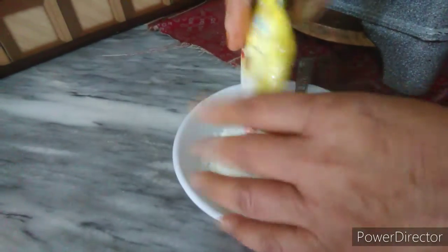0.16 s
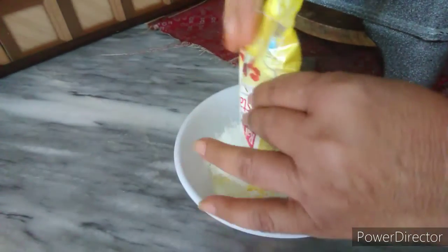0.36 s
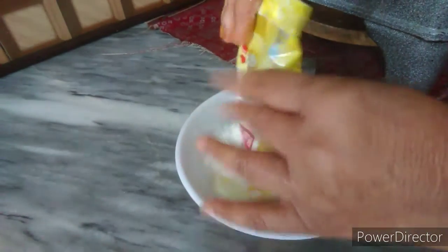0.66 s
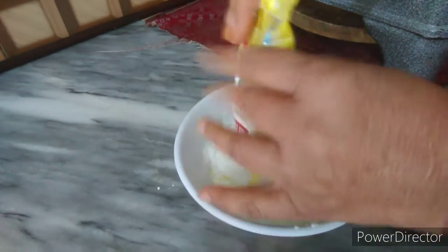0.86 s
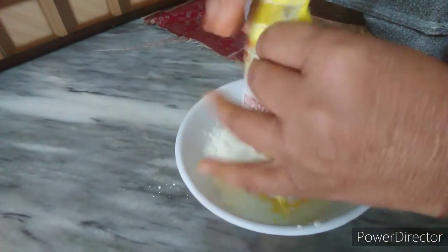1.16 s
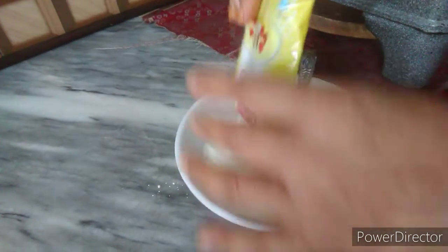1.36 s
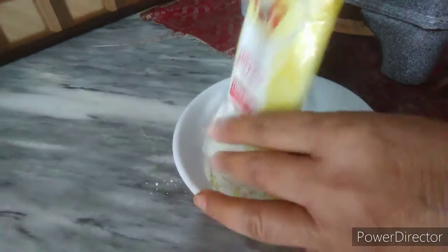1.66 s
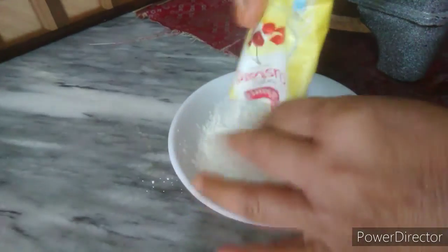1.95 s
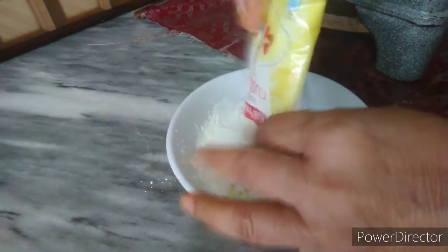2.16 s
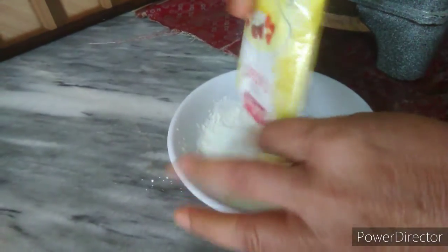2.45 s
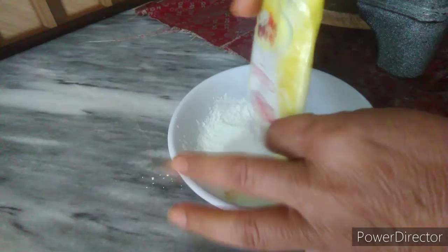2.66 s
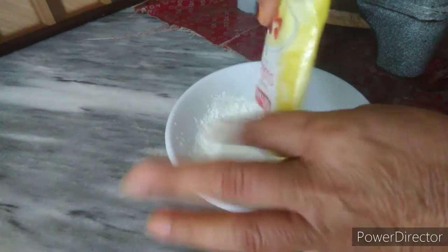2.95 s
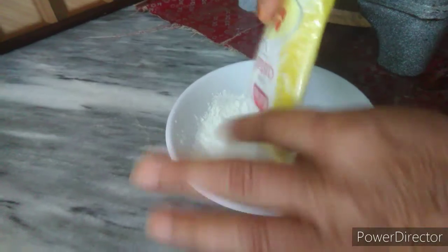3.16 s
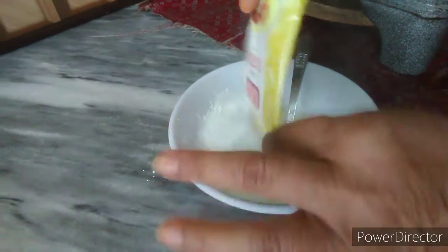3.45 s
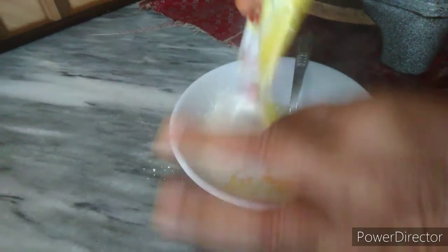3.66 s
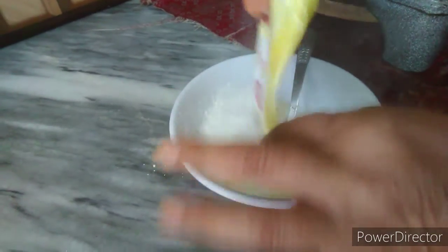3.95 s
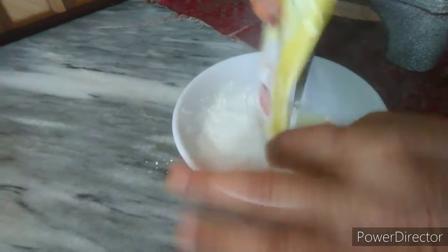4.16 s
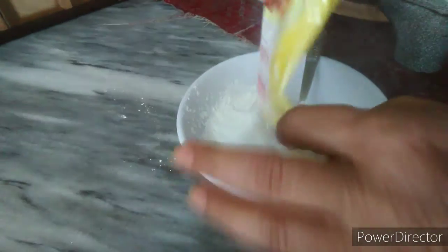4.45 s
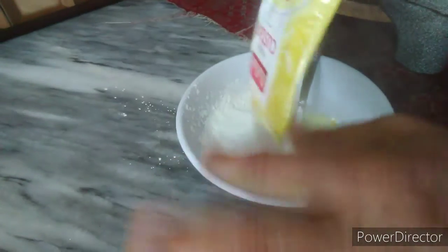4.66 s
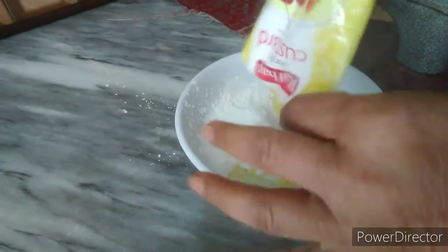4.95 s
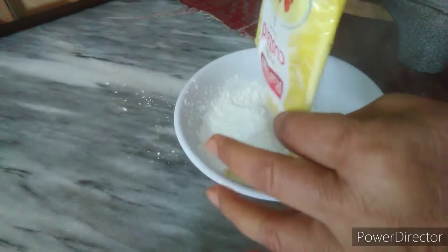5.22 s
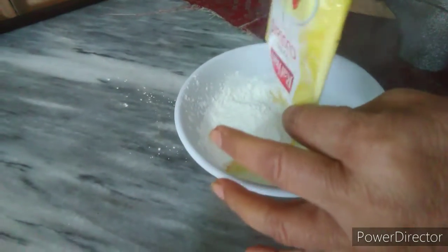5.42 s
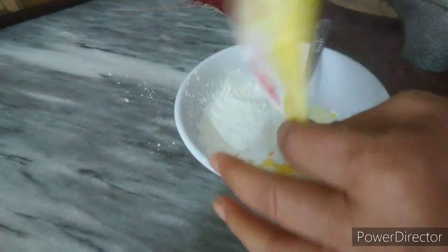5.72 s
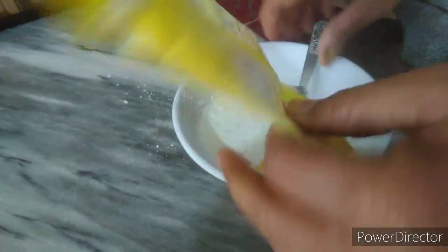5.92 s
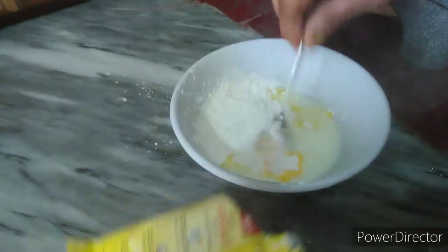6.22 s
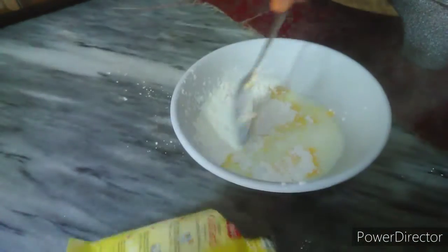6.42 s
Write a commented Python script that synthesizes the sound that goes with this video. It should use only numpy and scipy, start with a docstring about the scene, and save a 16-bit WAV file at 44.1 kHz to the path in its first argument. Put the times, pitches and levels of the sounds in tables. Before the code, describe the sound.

A small plastic packet is shaken and squeezed empty close to a phone in a small hard-walled kitchen. Sharp crackling snaps come in uneven bursts, about five shakes a second, with soft low flaps beneath. The crinkling grows louder and brighter toward the middle, thins out, snaps hard once more, then the packet is laid on stone with a soft thud and brief slide. A low hum stays underneath.

```python
"""Plastic sachet emptied in a kitchen

A plastic sachet is shaken and squeezed empty over a ceramic bowl, close to a phone in a small kitchen.
Each buckling crease is a run of tiny snaps, noise cracks plus decaying pings, over a fine crackle of clicks.
Shaped low noise makes the packet flap and thud at each shake. At the end it is laid on the stone counter
with a soft thud and slides: clicks through rising resonances. Mains hum and still air lie under it all.
"""
import sys
import numpy as np
from scipy import signal
from scipy.fft import rfft, irfft, next_fast_len
from scipy.io import wavfile
from scipy.ndimage import uniform_filter1d, map_coordinates

SR = 44100
rng = np.random.default_rng(int(sys.argv[2]) if len(sys.argv) > 2 else 0)


def dump(signal):
    """Clip the signal to [-1, 1] and save it as 16-bit WAV at the path in sys.argv[1]."""
    limited = np.clip(np.atleast_2d(signal).T, -1, 1)
    pcm = np.round(limited * 32767).astype(np.int16)
    wavfile.write(sys.argv[1], SR, pcm)


N = 290419
TIME_S = np.arange(N) / SR

# Radiation of the film. Each row: frequency in Hz, relative level in dB.
FILM = [(35, -38), (130, -19), (300, -14.5), (600, -8.5), (1150, -7.5), (1720, -4), (2400, -9.5),
        (3200, -0.5), (4400, -5.5), (5200, -2), (6200, -5.5), (7700, 0), (10100, -7.5), (11300, -14),
        (12700, -11.5), (14000, -16.5)]
# Shakes of the hand, about five a second; each crumples the film and jolts the packet. Each row: time in s,
# crumple energy in dB as rms over 1 ms, run spread in ms, relative jolt strength in dB, fold ring in Hz.
SHAKES = [(1.115, -15.5, 6.2, -39, 1700), (1.236, -14.5, 6.4, -33, 1710), (1.597, -26, 3, -35.5, 7910),
          (1.754, -18.5, 1.97, -32, 1680), (2.0196, -11, 4.7, -29, 5350), (2.212, -12.5, 5.2, -29, 2825),
          (2.418, -14, 5.46, -36.5, 3120), (2.608, -10.5, 6.1, -29.5, 826), (2.794, -14, 3.7, -29.5, 4900),
          (2.976, -19, 3, -32, 5220), (3.1653, -16.5, 4.1, -26, 3210), (3.397, -15.5, 3, -30, 3350),
          (3.596, -5.5, 1.84, -33, 860), (3.806, -9, 4.3, -32.5, 1560), (4.032, -5.5, 3.4, -29.5, 7910),
          (4.243, -8, 8.6, -42.5, 940), (4.464, -9, 4.4, -48, 7480), (4.75, -18, 5.3, -32.5, 1160),
          (5.091, -8, 2.74, -34.5, 9000), (5.281, -18, 2.4, -40.5, 3680), (5.477, -13.5, 2.6, -29, 3226),
          (5.641, -3.5, 2.8, -26, 3080)]
# Loudest creases before, during and between the shakes. Each row: time in s, energy in dB as rms over 1 ms,
# run spread in ms, fold ring in Hz, ring height in dB before the cap MAX_RING_DB.
CREASES = [(0.025, -40, 15, 1390, 10), (0.058, -19, 8, 1880, 11), (0.08, -19.5, 0.7, 1770, 13),
           (0.106, -10.5, 0.9, 900, 10), (0.253, -28, 6.4, 8200, 23), (0.397, -25, 3, 1720, 10),
           (0.439, -12.5, 2.8, 10300, 3.5), (0.461, -16.5, 1.05, 2260, 5), (0.554, -20.5, 0.65, 9250, 8),
           (0.583, -17.5, 0.73, 1690, 15), (0.645, -16, 0.94, 3320, 2.5), (0.668, -24.5, 6, 1300, 5),
           (0.77, -30.5, 0.6, 7900, 2), (0.791, -19, 0.8, 1730, 12), (0.816, -22, 1, 3080, 0),
           (0.888, -27, 5.1, 1360, 4.5), (0.929, -22, 0.7, 1700, 11), (0.964, -35, 0.6, 1700, 9.5),
           (1.018, -16, 10.4, 1940, 5), (1.136, -13.5, 1.84, 5830, 1), (1.205, -27, 1.2, 2270, 16),
           (1.256, -12.5, 0.53, 1720, 6), (1.333, -20.5, 7.5, 1730, 8), (1.349, -16.5, 2.64, 756, 8),
           (1.362, -21, 1.36, 3260, 9), (1.627, -15.5, 0.97, 3240, 7), (1.682, -17, 0.88, 2760, -2),
           (1.697, -16.5, 0.5, 3020, 16), (1.766, -23, 2.4, 1810, 8), (1.845, -26, 4.3, 5800, 9),
           (1.857, -20, 1.4, 6040, 11), (1.91, -20.5, 4, 5850, 9.5), (2.071, -15, 0.96, 8000, 5),
           (2.103, -16, 9, 930, 1), (2.182, -16.5, 7, 2540, 1.5), (2.29, -22.5, 8.2, 1200, -2),
           (2.3045, -13, 3, 1190, -9), (2.349, -20.5, 0.8, 774, 10), (2.483, -19, 8.2, 3800, -1),
           (2.497, -16.5, 0.92, 3820, 10.5), (2.541, -16.5, 3, 5220, 0), (2.661, -13.5, 0.61, 1920, 13),
           (2.717, -25, 0.5, 1770, 9), (2.87, -14.5, 1.22, 9500, 11), (2.923, -35, 0.7, 3500, 5),
           (2.959, -14, 0.56, 10100, 12), (3.039, -15.5, 7, 1900, 8.5), (3.177, -14.5, 1.3, 1000, 20),
           (3.226, -15, 3, 3380, 1.5), (3.349, -22.5, 3, 870, 9.5), (3.456, -20, 5.1, 3350, 2.5),
           (3.54, -14, 9.4, 1010, 8), (3.556, -12, 0.75, 910, 4), (3.581, -11.5, 1.13, 1720, 9),
           (3.604, -7.5, 1.4, 3100, -1), (3.674, -11.5, 0.56, 9800, 10.5), (3.703, -19, 1, 5200, -2),
           (3.719, -15.5, 5.4, 3170, -2), (3.734, -18.5, 0.82, 3440, 7), (3.88, -13, 5.3, 1680, 9),
           (3.905, -10.5, 0.7, 10000, 9), (3.921, -10, 4, 4700, 2.5), (3.991, -12.5, 0.45, 3170, 15),
           (4.104, -13, 3, 1200, 2), (4.312, -18, 1.5, 7700, -1), (4.135, -8, 0.7, 9500, 7),
           (4.145, -10, 12, 8360, 6), (4.243, -9.5, 0.8, 7910, -1), (4.323, -12.5, 3.9, 1524, 5),
           (4.344, -7, 0.95, 10300, 13), (4.352, -13, 6, 1190, 7), (4.371, -8.5, 3, 990, 9),
           (4.379, -8.5, 0.7, 1040, 7), (4.388, -14, 1, 8590, 6), (4.474, -10, 1, 7480, 5),
           (4.561, -14.5, 0.63, 7910, -3), (4.61, -12.5, 4.1, 9800, 7), (4.735, -12, 0.42, 4670, 7),
           (4.903, -19, 2.24, 5200, 2), (4.97, -23, 2, 9600, 2), (5.044, -23, 1.8, 9000, 2),
           (5.07, -19, 2.5, 4930, 7), (5.163, -18.5, 1.97, 3260, 3), (5.348, -22.5, 1.4, 3940, 11),
           (5.46, -19.5, 4.5, 2800, 1.5), (5.511, -18.5, 1.36, 2760, 5), (5.53, -17, 1.06, 8000, 3.5),
           (5.686, -17.5, 1.6, 3170, 6), (5.696, -11.5, 2.36, 4570, 6), (5.71, -17.5, 2.23, 2740, 6)]
# Bouts of handling; brightness is a base that each crease offsets.
# Each row: start in s, end in s, rustle level in dB, brightness in dB per octave.
BOUTS = [(0.028, 0.11, -54.5, -1.7), (0.439, 1.35, -54.5, -0.93), (1.596, 1.917, -64.5, -2),
         (1.998, 3.533, -49, -1.5), (3.54, 4.675, -40.5, 2), (4.893, 5.197, -57.5, 0),
         (5.266, 5.716, -68, -2)]

GRIP_S, RELEASE_S = 0.0084, 0.042  # rise and decay time constants of a bout
MIN_SPREAD_MS = 0.2
PRELUDE_MS = 6  # faint ticks ahead of a run
MAX_RING_DB = 10


def undb(db):
    """Decibels to gain."""
    return 10 ** (np.asarray(db) / 20)


def unit(x):
    """Scale to rms 1."""
    return x / np.sqrt(np.mean(x ** 2))


def pan(right_db):
    """Left and right gains that make the right louder by the given dB."""
    return undb(np.multiply.outer([-0.5, 0.5], right_db))


def add(out, s, sound):
    """Mix a sound in at time s."""
    start = max(int(s * SR), 0)
    out[:, start:start + sound.shape[1]] += sound[:, :max(N - start, 0)]


def gesture(start_s, end_s, rise_s, fall_s):
    """Gain over time: exponential attack, hold, release."""
    attack = 1 - np.exp(-np.maximum(TIME_S - start_s, 0) / rise_s)
    return attack * np.exp(-np.maximum(TIME_S - end_s, 0) / fall_s)


def colour(x, points, tilt_db=0, knee_hz=700):
    """Minimum-phase filter through (Hz, dB) points, tilted by dB per octave above the knee."""
    size = x.shape[-1]
    octave = np.log2(np.maximum(np.fft.rfftfreq(size, 1 / SR), 1))
    hz, db = np.transpose(points)
    gain_db = np.interp(octave, np.log2(hz), db)
    gain_db = gain_db + tilt_db * np.maximum(octave - np.log2(knee_hz), 0)
    # folding the cepstrum onto positive time makes the filter causal
    cepstrum = irfft(gain_db * np.log(10) / 20, size)
    cepstrum[1:size // 2] *= 2
    cepstrum[size // 2 + 1:] = 0
    return irfft(rfft(x) * np.exp(rfft(cepstrum)), size)


def ports(pair, likeness=0.65, alike_hz=1200):
    """Two unrelated signals become left and right: long waves reach both ports more alike than short ones."""
    size = pair.shape[-1]
    alike = likeness / (1 + (np.fft.rfftfreq(size, 1 / SR) / alike_hz) ** 2)
    mid, side = irfft(rfft(pair) * np.sqrt([1 + alike, 1 - alike]), size)
    return np.array([mid + side, mid - side])


def noise(points):
    """Steady stereo noise of a given colour, rms 1."""
    return unit(colour(ports(rng.standard_normal((2, N))), points))


def hum(hum_hz=99.3, third_db=-38):
    """About twice the mains frequency plus a weak third harmonic, drifting in level."""
    # Each row: time in s, level in dB before panning.
    hum_levels = [(0, -52.5), (1.25, -50), (1.55, -55.5), (2.1, -50), (3.5, -51.5), (6.15, -49),
                  (6.58, -56.5)]
    phase = 2 * np.pi * hum_hz * TIME_S
    tone = unit(np.sin(phase) + undb(third_db) * np.sin(3 * phase))
    return tone * undb(np.interp(TIME_S, *np.transpose(hum_levels)))


def still_air(level_db=-58):
    """Steady low-pitched noise of the room's air."""
    # Each row: frequency in Hz, relative level in dB.
    air_points = [(25, -24.5), (50, -4.5), (110, 5), (200, -7), (400, -35.5), (1500, -37), (6000, -40.5),
                  (14000, -37)]
    return noise(air_points) * undb(level_db)


def noise_bands(size):
    """Two white noises split into the bands in which the facets crack."""
    # A plain list of band edges in Hz.
    band_edges_hz = [0, 1200, 2400, 4500, 7000, 10000, 20000]
    hz = np.fft.rfftfreq(size, 1 / SR)
    edges = np.array(band_edges_hz)[:, None, None]
    masks = (hz >= edges[:-1]) & (hz < edges[1:])
    return irfft(rfft(rng.standard_normal((2, size))) * masks, size)


def snap_run(spread_ms, rise_ms=0.5, ring_ms=1.35, ping=0.6, low_hz=1200, high_hz=11000,
             prelude_db=-16, prelude_count=5, snap_range_db=13, facet_scatter_db=4.5, size=3072):
    """A crease gives way: faint ticks, then snaps that swell and die, each with its own facet's colour and ring."""
    count = min(5 + int(3 * spread_ms), 40)
    chance = rng.random((11, prelude_count + count))
    jitter, strength, pitch, turn_left, turn_right = chance[:5]

    nearing = (np.arange(prelude_count) + jitter[:prelude_count]) / prelude_count
    progress = 5.5 * (np.arange(count) + jitter[prelude_count:]) / count  # in spreads
    start_ms = np.r_[PRELUDE_MS * nearing, PRELUDE_MS + spread_ms * progress]
    force = np.r_[undb(prelude_db) * nearing, np.sqrt(progress * np.exp(-progress))]
    force = force * undb(snap_range_db * strength)

    age_ms = np.maximum(np.arange(size) / SR * 1000 - start_ms[:, None], 0)
    fade = force[:, None] * (1 - np.exp(-age_ms / rise_ms)) * np.exp(-age_ms / ring_ms)
    facet_hz = low_hz * (high_hz / low_hz) ** pitch
    turns = facet_hz[:, None] * age_ms / 1000 + np.array([turn_left, turn_right])[:, :, None]
    pings = (fade * np.sin(2 * np.pi * turns)).sum(1)

    # sqrt(3) gives the uniform draw a standard deviation of facet_scatter_db
    band_gains = undb(facet_scatter_db * np.sqrt(3) * (2 * chance[5:] - 1))
    mean_power = np.mean(band_gains ** 2, axis=1, keepdims=True)
    swells = np.sqrt(band_gains ** 2 @ fade ** 2 / mean_power)
    crack = (swells[:, None] * noise_bands(size)).sum(0)
    return crack + ping * pings


def fold_colour(ring_hz, ring_db, count=90, scatter_db=1.5, detune_oct=0.075, ring_width_oct=0.15):
    """Film resonances, shifted and reweighted by one fold's shape, plus the ring of its largest facet."""
    hz, film_db = np.transpose(FILM)
    chance = rng.standard_normal(len(hz) + 1)
    octave = np.linspace(np.log2(100), np.log2(16000), count)
    film = np.interp(octave + detune_oct * chance[0], np.log2(hz), film_db + scatter_db * chance[1:])
    distance = (octave - np.log2(ring_hz)) / ring_width_oct
    facet = min(ring_db, MAX_RING_DB) * np.exp(-0.5 * distance ** 2)
    return np.column_stack([2 ** octave, film + facet])


def crinkles(rows, echo_ring_share=0.36):
    """Buckling creases: each fold beams its ring straight ahead; sound for the echoes has a milder share."""
    near, far = np.zeros((2, 2, N))
    for s, db, spread_ms, tilt_db, ring_hz, ring_db in rows:
        run = ports(snap_run(max(spread_ms, MIN_SPREAD_MS)))
        for out, height_db in ((near, ring_db), (far, ring_db * echo_ring_share)):
            sound = colour(run, fold_colour(ring_hz, height_db), tilt_db)
            one_ms_gain = np.sqrt(2 * SR / 1000 / np.sum(sound ** 2))  # 0 dB: rms 1 over 1 ms
            add(out, s - PRELUDE_MS / 1000, sound * undb(db) * one_ms_gain)
    return near, far


def brightness(s, db, spread_ms, force_tilt_db=0.13, typical_db=-16, typical_ms=3.97, quick_tilt_db=1.0):
    """Crease tilt in dB per octave: set by the nearest bout, brighter the harder and quicker it gives way."""
    grip = min(BOUTS, key=lambda bout: max(bout[0] - s, s - bout[1]))
    force_tilt = force_tilt_db * (db - typical_db)
    quick_tilt = quick_tilt_db * np.log2(typical_ms / max(spread_ms, MIN_SPREAD_MS))
    return grip[3] + force_tilt + quick_tilt


def small_creases(latest_s=0.03, level_db=-16, mean_ms=1.2, low_hz=1500, high_hz=9000, ring_db=9):
    """Each shake or crease with a spread over 2 ms sets off a faint neighbour: rows like CREASES."""
    slow = [row[:3] for row in SHAKES + CREASES if row[2] > 2]
    s, db, _ = np.transpose(slow)
    delay, length, pitch = rng.random((len(s), 3)).T
    starts_s = s + latest_s * (1 + delay) / 2
    rings_hz = low_hz * (high_hz / low_hz) ** pitch
    rows = zip(starts_s, db + level_db, 2 * mean_ms * length, rings_hz)
    return [(*row, ring_db) for row in rows]


def folds(shake_tilt_db=-1, shake_ring_db=5):
    """All shaken and pressed folds; shaken ones are broad and duller. Rows as crinkles() takes them."""
    shaken = [(s, db, ms, brightness(s, db, ms) + shake_tilt_db, hz, shake_ring_db)
              for s, db, ms, _, hz in SHAKES]
    pressed = [(s, db, ms, brightness(s, db, ms), *ring)
               for s, db, ms, *ring in CREASES + small_creases()]
    return shaken + pressed


def handling():
    """How hard the fingers work the film, as a gain over time."""
    return sum(undb(db) * gesture(start, end, GRIP_S, RELEASE_S) for start, end, db, _ in BOUTS)


def grains(rate_per_s, scatter_db, ring_ms, size=512):
    """A steady shower of tiny noise clicks of unequal size."""
    sizes_db = scatter_db * np.minimum(rng.exponential(size=N), 4)
    clicks = (rng.random(N) < rate_per_s / SR) * undb(sizes_db) ** 2
    decay = np.exp(-2 * np.arange(size) / SR * 1000 / ring_ms)
    power = signal.fftconvolve(clicks, decay)[:N]
    return ports(np.sqrt(np.abs(power)) * rng.standard_normal((2, N)))


def rustle(buckles, settle_s=0.0042, settle_db=-12):
    """Fine crackle: the film slides under the fingers and keeps settling after each buckle."""
    keep = np.exp(-1 / (settle_s * SR))
    strain = signal.lfilter([1 - keep], [1, -keep], np.mean(buckles ** 2, axis=0))
    clicks = grains(rate_per_s=140, scatter_db=4.5, ring_ms=1.2)
    crackle = unit(colour(clicks, FILM, tilt_db=-3.0))
    return crackle * (handling() + undb(settle_db) * np.sqrt(strain))


def flapping(flap_db=-21.5, flap_s=0.17, flex_db=-13.5):
    """Gain of the packet's walls: they flex under the fingers and swing on after shakes while handled."""
    swing = sum(undb(db + flap_db) * gesture(s, s, GRIP_S, flap_s) for s, _, _, db, _ in SHAKES)
    held = sum(gesture(start, end, GRIP_S, RELEASE_S) for start, end, _, _ in BOUTS)
    return swing * held + undb(flex_db) * handling()


def thuds(rows, points, rise_s, fall_s, size=8192):
    """Soft pushes of air of a given colour, from (s, dB) rows."""
    out, t = np.zeros((2, N)), np.arange(size) / SR
    swell = (1 - np.exp(-t / rise_s)) * np.exp(-t / fall_s)
    for s, db in rows:
        push = unit(colour(ports(rng.standard_normal((2, size)) * swell), points))
        add(out, s, push * np.sqrt(np.mean(swell ** 2)) * undb(db))
    return out


def flexing(thud_db=-4.0):
    """The whole packet pushes air: its walls flap as it is handled and thud at each jolt."""
    # Each row: frequency in Hz, relative level in dB.
    packet_points = [(40, -34.5), (85, -12), (145, 3.5), (190, -4.5), (260, -5), (400, -6), (800, -13),
                     (2000, -43.5)]
    jolts = [(s, db + thud_db) for s, _, _, db, _ in SHAKES]
    return noise(packet_points) * flapping() + thuds(jolts, packet_points, rise_s=0.001, fall_s=0.015)


def slide(from_s=6.091, to_s=6.325, level_db=-50, rise_s=0.047, stop_s=0.014, rise_oct_per_s=0.7,
          judder_hz=23, judder_depth_db=3.5,
          touch_db=-37, touch_hold_s=0.022, touch_rise_s=0.0016, touch_fall_s=0.0092, touch_tilt_db=6.5):
    """Film lands with a bright swish and drags, catching and slipping, over dusty stone; resonances creep up."""
    # Resonances at mid slide. Each row: frequency in Hz, width in Hz, level in dB.
    modes = [(900, 330, 3.5), (1750, 290, -1.5), (2750, 500, -14), (3300, 330, -4.5), (3850, 450, -4.5),
             (5000, 860, -9), (6100, 500, -11), (6980, 900, -9), (9060, 3400, -18.5)]
    grit, hiss = grains(rate_per_s=3300, scatter_db=4.0, ring_ms=1.0), 0
    for hz, width_hz, db in modes:
        edges_hz = [hz - width_hz / 2, hz + width_hz / 2]
        band = signal.butter(2, edges_hz, "bandpass", fs=SR, output="sos")
        hiss = hiss + undb(db) * signal.sosfiltfilt(band, grit)

    # reading the hiss ever faster raises its pitch
    speed = 2 ** (rise_oct_per_s * (np.clip(TIME_S, from_s, to_s) - (from_s + to_s) / 2))
    position = np.cumsum(speed)
    hiss = unit(np.array([map_coordinates(side, [position], mode="mirror") for side in hiss]))

    swish = unit(colour(hiss, [(1, 0)], touch_tilt_db))
    landing = undb(touch_db) * gesture(from_s, from_s + touch_hold_s, touch_rise_s, touch_fall_s)
    judder_db = judder_depth_db * np.cos(2 * np.pi * judder_hz * (TIME_S - from_s))
    drag = undb(level_db + judder_db) * gesture(from_s, to_s, rise_s, stop_s)
    return swish * landing + hiss * drag


def putting_down(bump_s=6.044, bump_db=-38):
    """The packet meets the counter with a soft thud, slides and ticks."""
    # Radiation of the thud. Each row: frequency in Hz, relative level in dB.
    bump_points = [(40, -6), (90, 4.5), (250, -1), (480, -11), (800, -28), (2000, -48)]
    # Each row: time in s, energy in dB as rms over 1 ms, run spread in ms, brightness in dB per octave,
    # ring in Hz, ring height in dB before the cap MAX_RING_DB.
    ticks = [(6.048, -34.5, 3.5, 5.5, 7080, 10), (6.263, -30.5, 0.47, 3, 6400, 12),
             (6.277, -36, 0.9, -3, 3950, 11), (6.323, -30, 0.42, -1, 7280, 13),
             (6.352, -25.5, 0.7, -4, 1750, 4), (6.398, -44, 1.5, -8, 2290, 4),
             (6.523, -43.5, 0.6, 16, 7100, 11)]
    bump = thuds([(bump_s, bump_db)], bump_points, rise_s=0.0016, fall_s=0.015)
    return bump + slide() + crinkles(ticks)[0]


def kitchen(x, wet_db, t60_s=0.28, build_s=0.0026, size=22050):
    """Hard walls close by: noise-like echoes thicken quickly and fall 60 dB in t60_s."""
    t = np.arange(size) / SR
    envelope = (1 - np.exp(-t / build_s)) * np.exp(-np.log(1000) * t / t60_s)
    echoes = rng.standard_normal((2, size)) * envelope
    response = unit(ports(echoes)) / np.sqrt(size)
    return undb(wet_db) * signal.fftconvolve(x, response, axes=1)[:, :N]


def to_the_right(x):
    """Lean a stereo sound to the right, by an amount that varies with frequency."""
    # Each row: frequency in Hz, excess of right over left in dB.
    lean_points = [(140, 2.5), (400, 4.5), (2800, 4.5), (12000, 2.5)]
    hz, db = np.transpose(lean_points)
    size = next_fast_len(N)
    bins_hz = np.maximum(np.fft.rfftfreq(size, 1 / SR), 1)
    right_db = np.interp(np.log(bins_hz), np.log(hz), db)
    return irfft(rfft(x, size) * pan(right_db), size)[:, :N]


def scene():
    """The sachet a little to the right, in the room, then put down close by, over hum and still air."""
    near, far = crinkles(folds())
    body = rustle(near) + flexing()
    laid = putting_down()
    echoes = kitchen(far + body, wet_db=-5) + kitchen(laid, wet_db=-9)
    sachet = near + body + laid + echoes
    background = (hum() + still_air()) * pan([4.0])
    return to_the_right(sachet) + background


def record(dry, ceiling=0.82, top_hz=13900):
    """The phone rounds the hardest peaks and cuts the top."""
    rounded = dry / (1 + (dry / ceiling) ** 4) ** 0.25
    lowpass = signal.ellip(8, 0.2, 70, top_hz, fs=SR, output="sos")
    return signal.sosfilt(lowpass, rounded)


dry = scene()
out = record(dry)
dump(out)
```